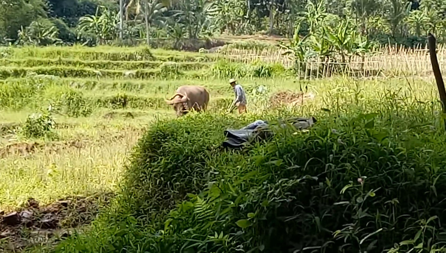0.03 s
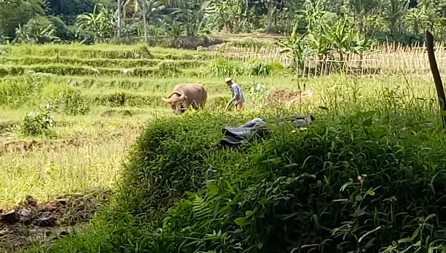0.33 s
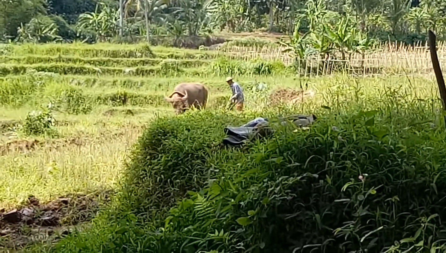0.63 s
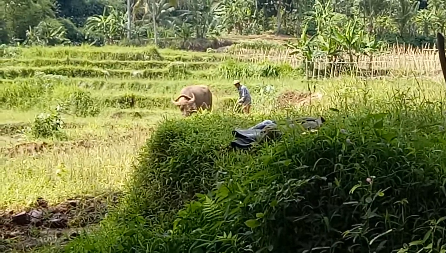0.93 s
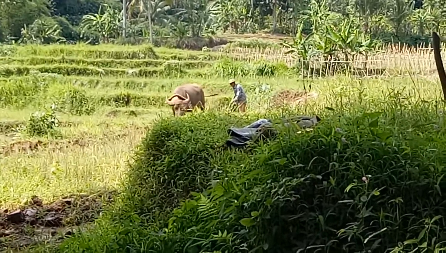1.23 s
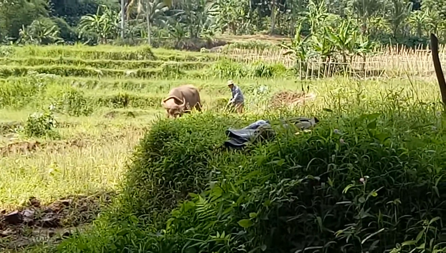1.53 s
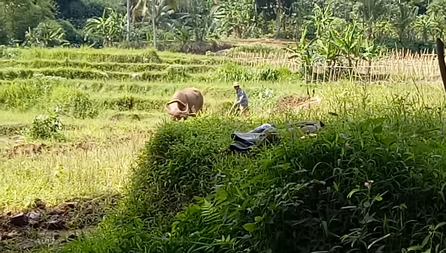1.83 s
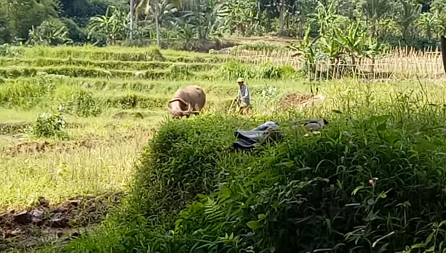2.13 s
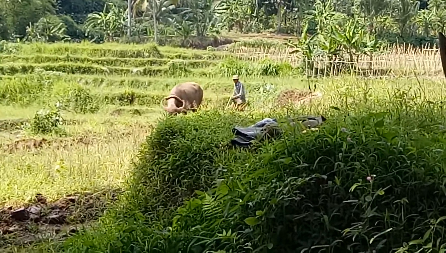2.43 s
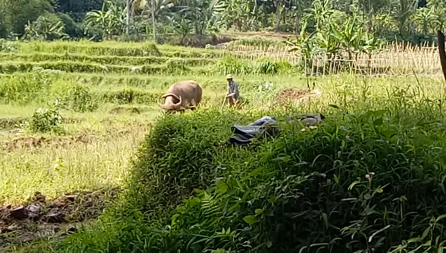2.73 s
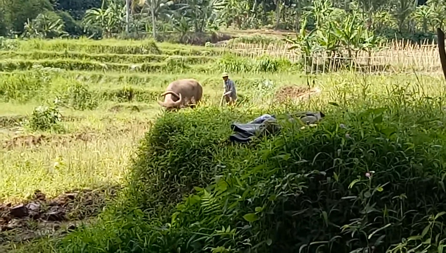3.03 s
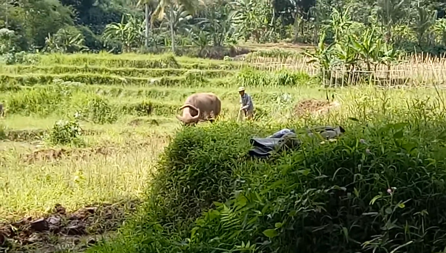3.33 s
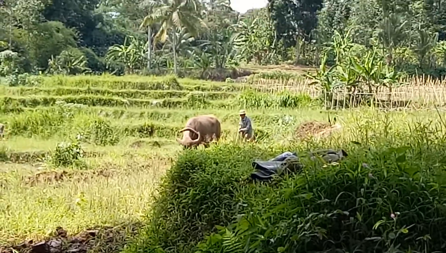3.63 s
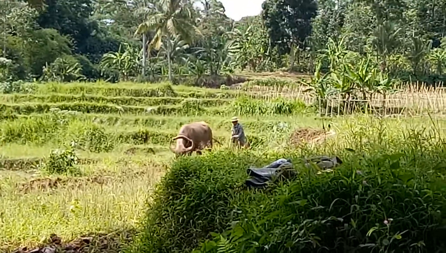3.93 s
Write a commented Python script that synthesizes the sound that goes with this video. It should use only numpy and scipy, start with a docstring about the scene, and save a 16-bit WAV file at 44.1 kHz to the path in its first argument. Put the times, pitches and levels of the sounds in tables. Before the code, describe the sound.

Off to the left, a distant small engine chugs in quick, regular pulses with light clinking, easing slightly in speed. Open-air hiss and a faint rumble fill the field, and a soft rustle swells and passes near the end.

```python
"""A farm field, in stereo, with a small single-cylinder motor running beyond it, off to the left.
It throbs some twenty times a second, slowing a little. Each firing is a short exhaust bark, a puff of gas
and a swelling low boom, with a metallic clink and a sharp tick on top. Under it lie a steady outdoor
hiss and a faint rumble; late on, a soft rustle swells and passes."""
import sys
import numpy as np
from scipy import signal
from scipy.fft import rfft, irfft
from scipy.io import wavfile
from scipy.ndimage import uniform_filter1d

SR = 44100
rng = np.random.default_rng(int(sys.argv[2]) if len(sys.argv) > 2 else 0)


def waveform_to_disk(signal):
    """Save audio, clipped to [-1, 1], as 16-bit WAV at the path in sys.argv[1]."""
    frames = np.transpose(np.atleast_2d(signal))
    scaled = np.clip(frames, -1, 1) * 32767
    samples = np.round(scaled).astype(np.int16)
    wavfile.write(sys.argv[1], SR, samples)


N = 176400
TICK_LEAD_S = .0012  # clink, tick and snap start this far ahead of each firing


def exhaust(fired, age):
    """Each firing barks in the exhaust and sets off a boom that swells and dies before the next."""
    # strength of the firings: t/s, bark level/dB, boom level/dB
    effort = [(0, 0.5, -5), (.2, -0.5, -7.5), (.4, .5, -12), (.65, 0.5, -9.5), (.95, -3, -5.5),
              (1.3, -1.5, -3.5), (1.7, -7, -3), (2.3, -4.5, -3), (2.7, -6, -4), (3.2, -7, -3),
              (4, -5.5, -4)]
    # body resonances of the exhaust, which stay put: f/Hz, decay/s, level/dB
    body_modes = [(163.3, 0.0079, -8), (122.5, 0.029, -26)]
    # its overtones, which drift: f/Hz, decay/s, level/dB
    overtone_modes = [(250.7, 0.0053, -23.5), (312.6, 0.015, -17.5), (419.5, 0.0073, -21),
                      (459.4, 0.015, -29)]
    # drift of the overtones: t/s, pitch ratio, level/dB relative to the bark
    drift = [(0, 1.024, 0.5), (.65, 0.96, -1), (.95, 0.98, 2.5), (1.25, 1, -0.5), (1.55, 0.94, 4.5),
             (1.8, 0.95, 6.5), (2.3, 1.015, 1.5), (2.6, 1.02, 3), (3, 1.01, 2), (4, .98, -2)]
    # pitch of the boom: t/s, f/Hz
    boom_pitch = [(0, 146.8), (.5, 145.6), (1.05, 136.7), (1.5, 139), (2.3, 144.3), (3, 141.6), (4, 145.5)]
    bark_lead_s, boom_lead_s = .0021, .0027
    chance = dict(spread=.011, scatter_db=.68)

    def bark(modes, ratio, level_db):
        return sum(rings(fired - bark_lead_s, hz * ratio, level_db + db, np.exp(-age / decay), **chance)
                   for hz, decay, db in modes)

    bark_db = curve(effort, fired)
    boom_db = curve(effort, fired, axis=2) - 9
    body = bark(body_modes, 1, bark_db)
    overtones = bark(overtone_modes, curve(drift, fired), bark_db + curve(drift, fired, axis=2))
    boom_envelope = swell(age, peak_s=.014, shape=2.23)
    boom = rings(fired - boom_lead_s, curve(boom_pitch, fired), boom_db, boom_envelope, **chance)
    pipe = cut(body - overtones + boom, hz=79, kind="high", order=4)
    muffled = cut(pipe, hz=475.7, kind="low", order=7)
    return from_left(muffled)


def puff(fired, t, lead_s=.0038):
    """Gas leaves the exhaust in a short, rough puff at each firing."""
    # noise bands of the gas: f/Hz, width/Hz, left level/dB, right level/dB
    bands = [(880, 2070, -38, -49), (2194, 760, -41, -43)]
    _, age = latest(fired - lead_s, t)
    return swell(age, peak_s=.0018, shape=.48) * hiss_bands(bands)


def rattle(fired, age):
    """Metal parts clink and tick with every firing; no two ticks have the same colour."""
    # the metal parts: t/s, clink level/dB, tick level/dB, clink f/Hz, tick pitch ratio
    metal = [(0, -8, -12, 2050, .88), (.08, 1, -12, 2200, .88), (.22, 2, -11, 2250, .9),
             (.4, -8, -3, 2300, .9), (.75, -9, -4, 2250, .94), (1.02, -7, 1, 2100, 1),
             (1.2, -6, -1, 2080, 1.03), (1.55, -6, 0, 2030, 1.08), (2.25, -8, 0, 2000, 1.05),
             (2.6, -8, -4, 2000, 1), (3.3, -8, -4, 2000, 1), (4, -9, -7, 2000, 1)]
    # ringing of the tick: f/Hz, left level/dB, right level/dB
    tick_modes = [(1160, -46.5, -58), (3670, -51.5, -44.5), (4420, -36, -32), (4780, -38.5, -28.5),
                  (6010, -32, -43.5), (6600, -51, -63)]
    struck = fired - TICK_LEAD_S
    clink_hz, clink_db = curve(metal, fired, axis=3), curve(metal, fired) - 41.5
    clink_envelope = swell(age, peak_s=.002, shape=.93)
    clinks = [rings(struck, clink_hz, clink_db, clink_envelope, spread=.056, scatter_db=3)
              for side in range(2)]
    out = pan(db=2.5) * np.array(clinks)
    scatter_db = 1.7
    tick_db = curve(metal, fired, axis=2) + scatter_db * rng.standard_normal(len(fired))
    tick_ratio = curve(metal, fired, axis=4)
    tick_envelope = swell(age, peak_s=.0005, shape=1)
    for hz, *sides in tick_modes:
        out += [rings(struck, hz * tick_ratio, tick_db + db, tick_envelope, .06, scatter_db)
                for db in sides]
    return out


def snap(fired, t, scatter_db=3.9):
    """A split-second spit of treble tops each tick."""
    # noise bands of the snap: f/Hz, width/Hz, left level/dB, right level/dB
    bands = [(11200, 9500, -48.5, -51.5), (13870, 1900, -47.5, -61.5)]
    # strength of the snap: t/s, level/dB
    level = [(0, -27), (.6, -4.5), (1.02, 6), (1.2, 0), (1.55, 0.5), (2.2, 3), (2.8, -4), (3.3, 4),
             (3.65, 2), (4, -9)]
    last, age = latest(fired - TICK_LEAD_S, t)
    size = undb(curve(level, fired) + scatter_db * rng.standard_normal(len(fired)))
    return size[last] * swell(age, peak_s=.00059, shape=.5) * hiss_bands(bands)


def knocks(t):
    """Light, dry knocks and rough clinks, a little left of centre."""
    # one noise burst per knock: t/s, f/Hz, width/Hz, level/dB
    hits = [(.071, 2150, 550, -30), (.113, 2280, 550, -30), (.154, 2380, 550, -30), (.196, 2200, 550, -29),
            (.238, 2170, 550, -30), (1.821, 1950, 900, -31), (.322, 2000, 2500, -33),
            (2.458, 2100, 2000, -32)]
    bursts = sum(hiss(hz, width) * undb(db) * swell(np.maximum(t - start, 0), peak_s=.0017, shape=1)
                 for start, hz, width, db in hits)
    return bursts * pan(db=4)


def rustle(t, grain_db=1.3):
    """Soft, grainy swishes, as of leaves, swell and fade, mostly on the left."""
    # swishes: middle t/s, half length/s, f/Hz, width/Hz, left level/dB, right level/dB
    swishes = [(2.698, 0.084, 3800, 1400, -39.5, -49), (2.8, 0.14, 2940, 1200, -37.5, -46.5),
               (2.923, 0.039, 1840, 1420, -34, -50), (2.8, 0.15, 930, 710, -42.5, -48.5),
               (3.017, 0.15, 684, 590, -39, -49), (3.188, 0.18, 2420, 2420, -45.5, -46.5),
               (3.575, 0.52, 3360, 1630, -40.5, -52), (3.848, 0.44, 4150, 1270, -47, -40),
               (3.898, 0.23, 1470, 2000, -49, -63)]
    out = np.zeros((2, N))
    for middle, half, hz, width, left, right in swishes:
        envelope = np.exp(-((t - middle) / half) ** 2 / 2)
        out += hiss(hz, width) * envelope * undb([[left], [right]]) * undb(grain_db * walk(rate=72))
    return out


def air(t, rumble_hz=149, split_hz=1520, gain_db=-4.5, rumble_db=5.5, flicker_db=.6):
    """Outdoor hiss over a faint, steady rumble, partly shared by both microphones."""
    # spectrum of the open air: f/Hz, left level/dB, right level/dB
    spectrum = np.array([(25, -14, -16), (58, -33, -18.5), (284, -17.5, -28), (733, -34.5, -39.5),
                         (1410, -36.5, -47), (2260, -26.5, -36.5), (3100, -35.5, -39.5), (4410, -32.5, -32),
                         (5130, -44.5, -39), (6470, -42, -46.5), (7900, -57, -67), (11100, -58, -56.5),
                         (14500, -53.5, -64)], float)
    # hiss either side of split_hz: t/s, low level/dB, high level/dB
    level = [(0, 6.8, 0.49), (.5, 5, 4.1), (1, 9.7, 1.2), (1.7, 10, 1.8), (2.4, 8.4, 3.4), (3, 14.2, 1.3),
             (4, 11.9, 0.66)]
    hz = np.fft.rfftfreq(N, 1 / SR) + 1
    colour = undb([np.interp(np.log(hz), np.log(spectrum[:, 0]), side) for side in spectrum.T[1:]])
    shared = np.clip(.2 + 1 / (1 + (hz / 350) ** 2), 0, .95)  # the bass is nearly mono
    noise = rfft(rng.standard_normal(N)) * np.sqrt(shared)
    noise = noise + rfft(rng.standard_normal((2, N))) * np.sqrt(1 - shared)
    deep, low = (1 / (1 + (hz / edge) ** 4) for edge in (rumble_hz, split_hz))
    parts = [(deep, rumble_db), (low - deep, curve(level, t)), (1 - low, curve(level, t, axis=2))]
    return sum(irfft(noise * colour * part, N) * undb(gain_db + db + flicker_db * walk(rate=8.886))
               for part, db in parts)


def from_left(x, lag_s=.00032):
    """The sound reaches the right microphone later and weaker."""
    late = np.interp(np.arange(N) - lag_s * SR, np.arange(N), x)
    return np.array([x, late]) * pan(db=6.7)


def rings(times, hz, db, envelope, spread, scatter_db):
    """One resonance rung at each time, with a little chance in pitch and strength."""
    chance, n = rng.standard_normal((len(times), 2)).T, len(envelope)
    out = np.zeros(N + 2 * n)
    for start, f, size in zip(times, hz * (1 + spread * chance[0]), undb(db + scatter_db * chance[1])):
        i = int(start * SR) + n
        out[i:i + n] += size * envelope * np.sin(2 * np.pi * f * np.arange(n) / SR)
    return out[n:n + N]


def latest(starts, t):
    """Index of the latest start at each time t, and the seconds from it."""
    last = np.maximum(np.searchsorted(starts, t) - 1, 0)
    return last, abs(t - starts[last])


def swell(age, peak_s, shape):
    """An envelope that rises to 1 at peak_s and dies away."""
    return (age / peak_s * np.exp(1 - age / peak_s)) ** shape


def hiss(hz, width):
    """Stereo noise passed twice through one resonance, rms 1."""
    b, a = signal.iirpeak(min(hz, .45 * SR), hz / width, fs=SR)
    x = signal.lfilter(b, a, signal.lfilter(b, a, rng.standard_normal((2, N))))
    return x / x.std()


def hiss_bands(bands):
    """Several noise bands, each with its own left and right level."""
    return sum(hiss(hz, width) * undb([[left], [right]]) for hz, width, left, right in bands)


def walk(rate):
    """Smooth chance with a spread of 1, drawn rate times a second."""
    k = int(SR / rate)
    steps = np.repeat(rng.standard_normal(N // k + 1), k)
    x = uniform_filter1d(uniform_filter1d(steps, k), k)[:N]
    return x / x.std()


def cut(x, hz, kind, order):
    """A low-pass or high-pass slope without delay."""
    return signal.sosfiltfilt(signal.butter(order, hz, kind, fs=SR, output="sos"), x)


def curve(table, t, axis=1):
    """One column of a table at the times t."""
    rows = np.array(table, float)
    return np.interp(t, rows[:, 0], rows[:, axis])


def pan(db):
    """Left and right gains, the left louder by db."""
    return undb(np.array([[db], [-db]]) / 2)


def undb(db):
    """Decibels to gain."""
    return 10 ** (np.asarray(db) / 20)


def scene():
    """The motor fires once a cycle, over the sounds of the field."""
    # firing rate of the motor: t/s, f/Hz
    rate = [(0.0, 24.313), (0.2, 23.826), (0.6, 23.222), (0.95, 22.326), (1.2, 21.827), (1.47, 20.62),
            (1.56, 21.09), (1.75, 20.55), (2.05, 21.794), (2.3, 22.749), (2.55, 22.61), (2.72, 21.251),
            (3.05, 19.914), (3.3, 19.789), (3.8, 19.813), (4.0, 20.438)]
    t = np.arange(N) / SR
    age = t[:SR // 10]  # each firing rings for up to 0.1 s
    cycles = np.cumsum(curve(rate, t)) / SR
    fired = np.interp(np.arange(.792, cycles[-1]), cycles, t)
    fired = np.r_[fired[0] - 1 / rate[0][1], fired]  # already running
    motor = exhaust(fired, age) + puff(fired, t) + rattle(fired, age) + snap(fired, t)
    return motor + knocks(t) + air(t) + rustle(t)


def record(dry, top_hz=15500):
    """The recorder cuts the top."""
    return signal.sosfilt(signal.ellip(8, .2, 70, top_hz, fs=SR, output="sos"), dry)


dry = scene()
out = record(dry)
waveform_to_disk(out)
```